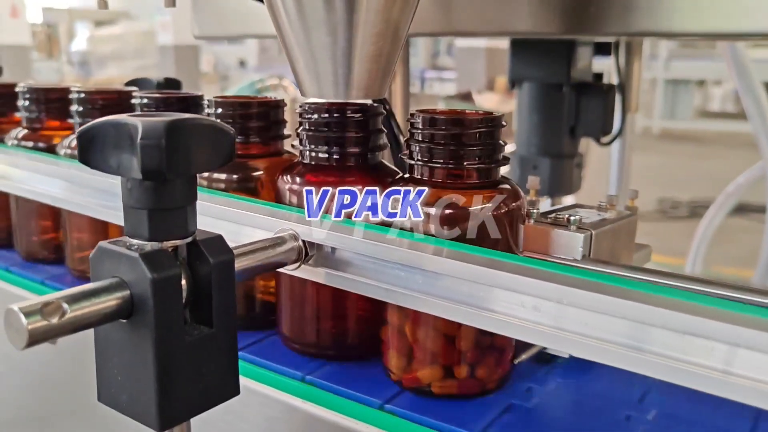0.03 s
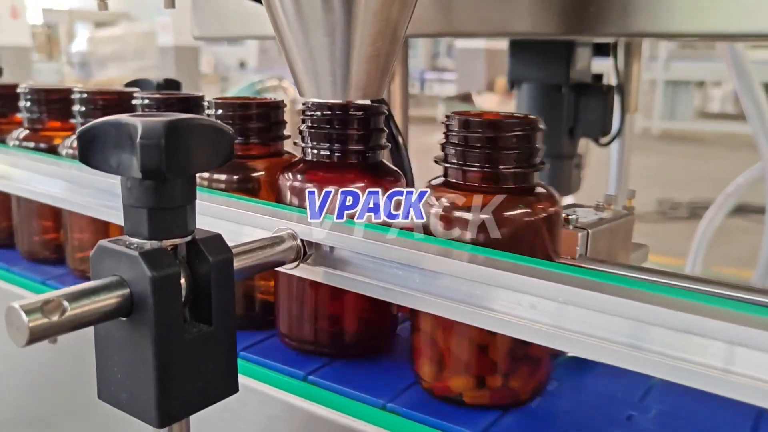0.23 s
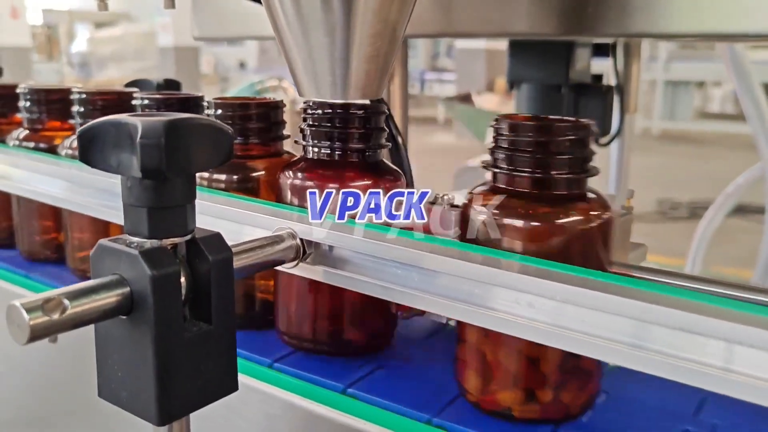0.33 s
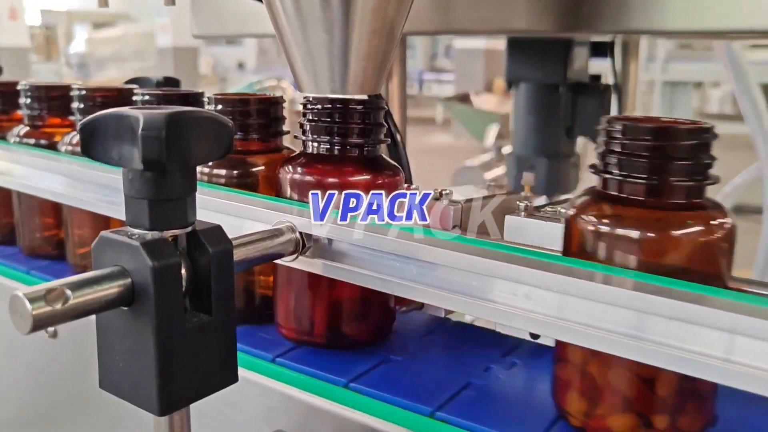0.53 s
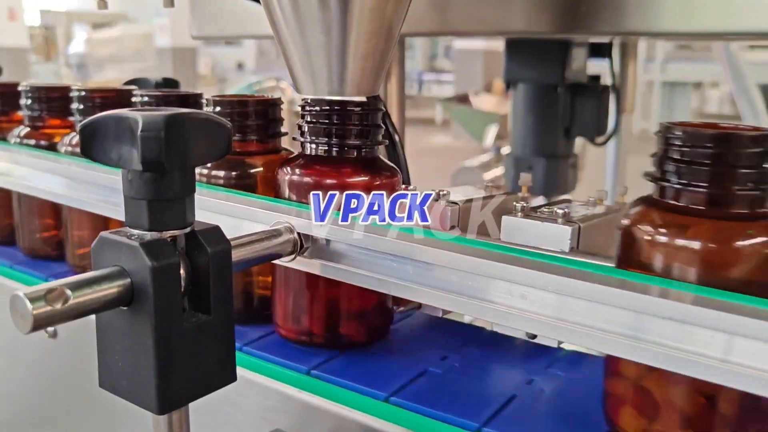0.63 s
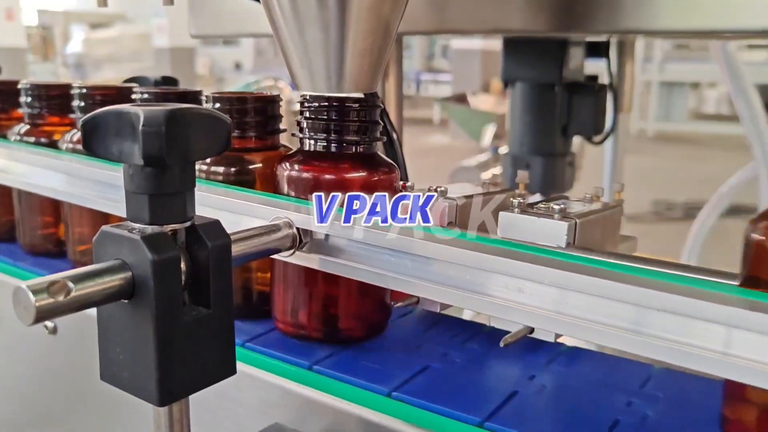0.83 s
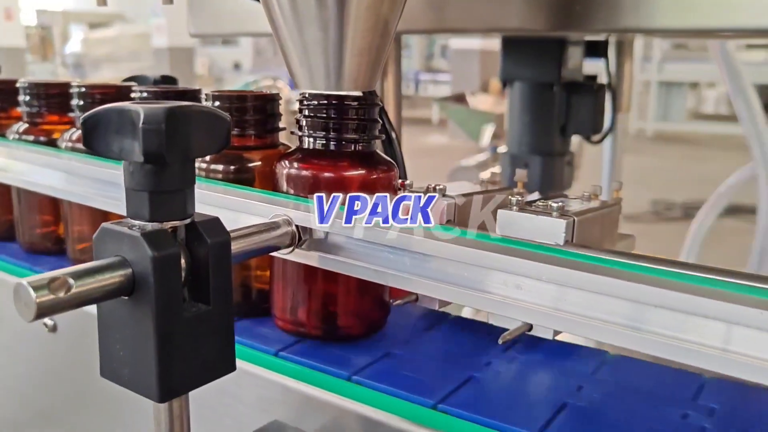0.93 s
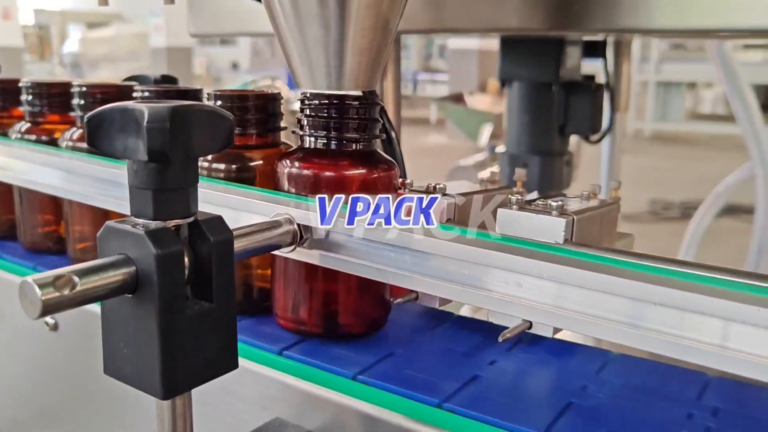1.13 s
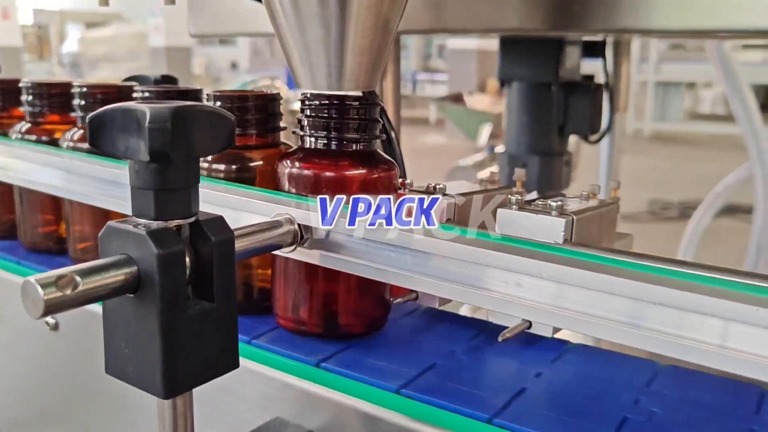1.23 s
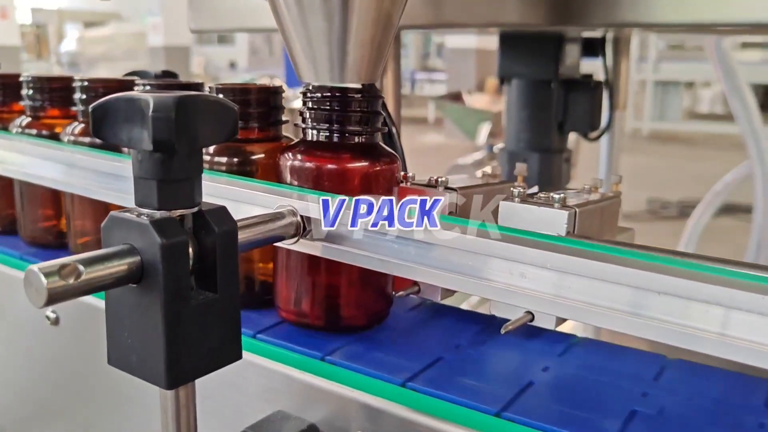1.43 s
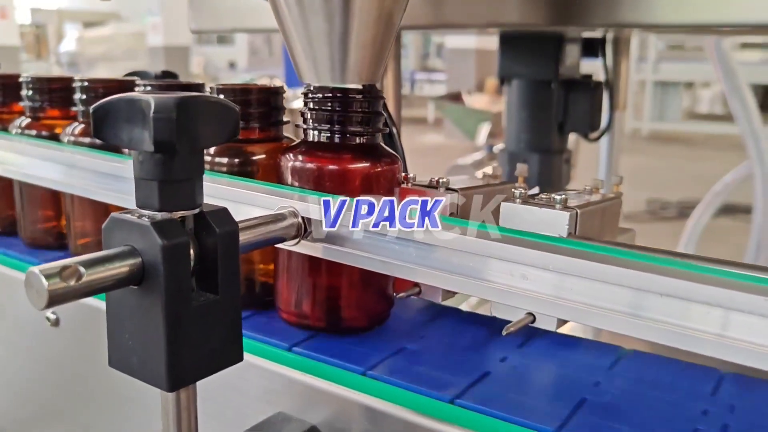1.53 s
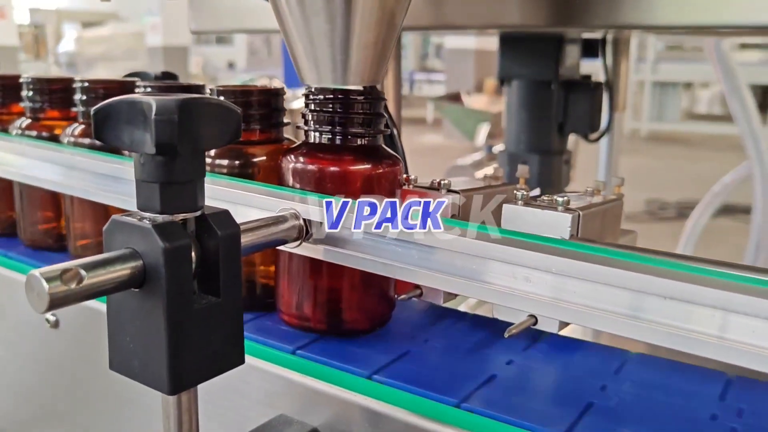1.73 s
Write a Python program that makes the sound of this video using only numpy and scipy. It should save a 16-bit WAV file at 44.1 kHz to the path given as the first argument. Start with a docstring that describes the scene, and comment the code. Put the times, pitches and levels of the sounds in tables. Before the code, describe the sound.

Capsules rattle into a plastic bottle, close up, over a steady factory hum. Air puffs at about 0.2 seconds and a steel gate clanks open at 0.3. Capsules clatter down a funnel, knocking into the bottle from 0.45 to 0.75 seconds. With another puff, the gate clacks shut near 0.9. Soft, scattered ticks and a faint whirr follow, and a low motor hum fades in from 1.6 seconds.

```python
"""A humming factory hall, close to the capsule filler of a packaging line.
An air cylinder puffs turbulent exhaust and throws a steel gate open, exciting its normal modes.
Capsules rattle down the funnel in a train of small impacts and knock a plastic bottle into resonance.
The gate clacks shut, the feeder ticks on and a motor starts to hum."""
import sys
import numpy as np
from scipy import signal
from scipy.fft import rfft, irfft
from scipy.io import wavfile
from scipy.ndimage import uniform_filter1d

SR = 44100
rng = np.random.default_rng(int(sys.argv[2]) if len(sys.argv) > 2 else 0)


def put_to_file(sound):
    """Save the sound as 16-bit audio at rate SR, in the file named by the first command-line argument."""
    columns = np.atleast_2d(sound).T  # one column per channel
    safe = np.clip(columns, -1, 1)
    whole_steps = np.round(safe * 32767)
    wavfile.write(sys.argv[1], SR, whole_steps.astype(np.int16))


N = 79380
TIME = np.arange(N) / SR
RING_TIME = TIME[:SR // 2]

# Capsule stream and single scrapes in the funnel: t/s, level/dB
FLOW = [(.31, -34.5), (.325, -28), (.365, -28.5), (.403, -36.5), (.44, -31.5), (.47, -29), (.5, -35),
        (.552, -38.5), (.585, -33.5), (.62, -35.5), (.652, -53), (.675, -36), (.72, -53.5), (.75, -51),
        (.79, -68)]
SCRAPES = [(.381, -27), (.411, -25), (.427, -29)]
# Landings in the bottle: t/s, ring level/dB, click level/dB, bottle f/Hz, shell f/Hz
KNOCKS = [(0.449, -22, -18, 1463, 3740), (0.4547, -21.5, -17, 1473, 4950), (0.4658, -20, -18, 1467, 5920),
          (0.5108, -15.5, -27.5, 1498, 2950), (0.5625, -22, -22.5, 1480, 4820),
          (0.5705, -24, -19.5, 1465, 4200), (0.5802, -21.5, -29, 1464, 2395), (.586, -21, -26, 1471, 4060),
          (0.6051, -21.5, -27, 1492, 4270), (0.6777, -22, -29.5, 1493, 2875), (0.703, -36, -37, 1510, 4730),
          (0.7285, -29, -33, 1495, 2550), (0.7325, -17, -21.5, 1501, 4050), (1.478, -47, -49, 2720, 6350)]
# Modes of the bottle: frequency ratio, level/dB
BOTTLE_MODES = [(1, 1), (1.68, -13), (1.84, -17.5), (1.95, -15), (2.75, -15.5)]
# Blows on gate and funnel: t/s, ring level/dB, click level/dB, favoured f/Hz
CLANKS = [(.3145, -16.5, -26, 617), (.3374, -22.5, -33, 1780), (.3551, -14, -23.5, 1700),
          (.403, -28.5, -53, 1820), (.412, -24.5, -44, 4940)]
# Modes of that steel and of the gate's stop: f/Hz, level/dB, T60/s
STEEL_MODES = [(554.6, 1, 0.06), (660.8, -1, 0.29), (1700, 2, 0.039), (1779, -6.5, 0.12),
               (2555, -2.5, 0.073), (3170, -4, 0.24), (3420, 0, 0.13), (4080, -3, 0.09),
               (4875, 10.5, 0.092), (5460, -6, 0.12), (6200, -7, .14)]
STOP_MODES = [(333, -20.5, 0.078), (460, -19, 0.16), (1213, -3.5, 0.044), (1425, -8, 0.026),
              (1522, -2, 0.09), (1700, -0.5, 0.043), (1958, -6, 0.029), (2240, -9, 0.027),
              (3902, 0.5, 0.025), (4100, -3.5, 0.022), (4630, 3.5, 0.026), (4850, -5, .03),
              (5150, 3.5, 0.023), (5456, 5, 0.028), (7060, 1, 0.04)]
# Exhaust puffs: peak t/s, level/dB, rise/s, T60/s
PUFFS = [(0.207, -33, 0.005, 0.11), (.234, -33.5, 0.02, 0.13), (0.264, -17, .013, 0.087),
         (0.85, -36.5, 0.0072, 0.16), (0.868, -28.5, 0.014, 0.076)]
# Jolts of the piston: t/s, level/dB, T60/s
THUMPS = [(0.203, -41, 0.091), (0.215, -29.5, 0.13), (0.263, -38, 0.14), (.313, -27.5, 0.11),
          (.845, -37, 0.17), (.932, -47, 0.089)]
# Feeder ticks: t/s, level/dB, rise/s, T60/s, tilt/(dB per octave)
TICKS = [(0.038, -40.5, 0.0014, 0.14, -2.5), (0.091, -35, 0.003, 0.087, 0.5), (1.056, -33, 0.002, 0.089, 1),
         (1.164, -45, 0.0012, 0.067, 0.5), (1.233, -36, 0.0063, 0.11, -1.5), (1.427, -43, 0.0018, 0.063, 7),
         (1.4365, -36, 0.0028, 0.089, 2), (1.618, -38, 0.006, 0.11, -0.5)]
# Partials of the motor: f/Hz, level/dB
HUM_PARTIALS = [(156.3, -45.5), (262, -56)]
# Envelopes of the hall's noise, its relative treble and the drive's whirr: t/s, level/dB
HALL_LEVEL = [(0, -47), (.17, -49), (.8, -51), (1.0, -51), (1.35, -52), (1.55, -51), (1.8, -49)]
TREBLE_LEVEL = [(.09, 4), (.15, 0), (1.0, 2), (1.31, -5.5), (1.41, -6.5), (1.47, -5), (1.75, 1)]
WHIRR_LEVEL = [(.7, -57), (1.12, -61.5), (1.22, -53), (1.8, -54)]
# Spectral densities of the noises: f/Hz, relative level/dB
RATTLE_SPECTRUM = [(200, -3.5), (500, -1.5), (1000, -12), (1700, 0.5), (2100, -3.5), (2650, 2),
                   (3200, -6.5), (5200, -3), (7000, -4.5), (9500, -19.5), (11500, -13.5), (15600, -21)]
SCRAPE_SPECTRUM = [(3800, -19.5), (4850, -2), (5550, 3), (6300, -16), (9000, -32)]
SHELL_SPECTRUM = [(500, -16), (900, -17), (1400, 2), (2000, -7.5), (2700, 7.5), (3400, 0.5), (4600, 8),
                  (6000, -2.5), (8400, -2), (9800, -13.5), (15600, -23)]
STOP_SPECTRUM = [(200, -9), (900, -4.5), (1450, 6), (3200, -7.5), (3900, -3), (5100, 1), (7400, 1),
                 (8600, -9), (15600, -8)]
AIR_SPECTRUM = [(100, -26), (500, -7.5), (1200, -1), (2700, 1), (3900, -2.5), (4800, 5.5), (5400, 1),
                (7500, -3), (9500, -13.5), (11500, -7), (15500, -11.5)]
FRAME_SPECTRUM = [(30, -38), (47, -42), (66, -4.5), (130, -5.5), (260, -6), (450, -12.5), (3000, -47)]
TICK_SPECTRUM = [(150, -21), (500, 0), (1200, -9), (1700, 6), (2200, -6.5), (2900, 2.5), (3450, 5.5),
                 (4300, -1.5), (5600, -6.5), (7400, -0.5), (9200, -24), (11500, -17.5), (15500, -34)]
HALL_SPECTRUM = [(25, -50), (70, -8.5), (115, -10.5), (180, -3), (300, -4), (430, -0.5), (800, -2.5),
                 (1230, -11), (1560, 0), (2300, -10), (2700, -1), (3100, -11), (4550, -3.5), (5600, -11),
                 (6400, -10), (8600, -18.5), (9200, -49), (11700, -29), (13500, -43), (15500, -33)]
WHIRR_SPECTRUM = [(200, -45), (390, -8.5), (470, 1), (560, -14), (720, -17.5), (1500, -48.5)]
WHITE = [(20, 0), (20000, 0)]
# Reverberation time of the hall: f/Hz, T60/s
HALL_T60 = [(100, 0.24), (600, 0.66), (5000, 0.42), (12000, 0.16)]
# Likeness of left and right: f/Hz, correlation
CORRELATION = [(150, .992), (600, .9), (1400, .5), (2300, -.15), (5000, .05)]
# Boost on the right, and equal cut on the left, for distant sources: f/Hz, level/dB
FAR_RIGHT = [(3500, 0.3), (6000, 3.5), (9000, 1), (15500, 4)]
# Microphone responses: f/Hz, level/dB
LEFT_MIC = [(1200, 0), (3500, -0.5), (5700, -4), (7200, 0), (8400, 4), (13000, 0), (15500, 3)]
RIGHT_MIC = [(1200, -0.5), (2700, 5), (6300, 5), (7400, 0), (8100, -3), (8700, -35), (9600, -7.5),
             (13500, 0), (15500, 8)]


def funnel(contacts_per_s=1500, spread_db=2.4, contact_t60=.016, spots=10, detune=.06):
    """Random impacts of sliding capsules each ring one spot of the wall; friction adds scrapes."""
    hits = rng.random(N) < contacts_per_s / SR
    contacts = hits * amp(spread_db * np.minimum(rng.exponential(1, N), 3))
    power = signal.fftconvolve(contacts ** 2, amp(-60 * RING_TIME / contact_t60) ** 2)[:N]
    clicks = unit_rms(low_cut(np.sqrt(abs(power)) * noise(RATTLE_SPECTRUM)))
    spot = rng.integers(0, spots, N)
    ringing = np.zeros((2, N))
    for k in range(spots):
        modes = [(hz * (1 + detune * rng.uniform(-1.02, 1)), db, .05)
                 for hz, db, _ in STEEL_MODES if hz > 2000]
        ringing += signal.fftconvolve((contacts * (spot == k))[None], ring(modes, .0016), axes=1)[:, :N]
    pouring = (TIME > FLOW[0][0]) & (TIME < FLOW[-1][0])
    out = pouring * envelope(FLOW) * (clicks + amp(-4) * unit_rms(ringing))
    for s, db in SCRAPES:
        add(out, s, burst(SCRAPE_SPECTRUM, db, rise=.0022, t60=.099))
    return out


def bottle(rise=.0013, bottle_t60=.035, shell_t60=.03):
    """A collision excites both bodies: the bottle and the capsule's shell ring at their own pitches."""
    out = np.zeros((2, N))
    for s, ring_db, click_db, bottle_hz, shell_hz in KNOCKS:
        body = ring([(bottle_hz * ratio, db, bottle_t60) for ratio, db in BOTTLE_MODES], rise, hold=.004)
        shell = ring([(shell_hz, click_db - 1, shell_t60)], rise)
        click = burst(SHELL_SPECTRUM, click_db, rise=.00048, t60=.039)
        add(out, s, amp(ring_db) * body + shell + click)
    return out


def gate(favour_octaves=.4, others_db=-18, shut_s=.8708):
    """Free vibration of struck steel: each blow favours nearby modes; closing rings the stop."""
    out = np.zeros((2, N))
    for s, ring_db, click_db, favoured_hz in CLANKS:
        modes = []
        for hz, db, t60 in STEEL_MODES:
            mismatch = 1 - np.exp(-(np.log2(hz / favoured_hz) / favour_octaves) ** 2)
            modes.append((hz, db + others_db * mismatch, t60))
        clank = amp(ring_db) * ring(modes, rise=.002)
        click = low_cut(burst(RATTLE_SPECTRUM, click_db, rise=.00038, t60=.064))
        add(out, s, clank + click)
    stop = amp(-16) * ring(STOP_MODES, rise=.0016, hold=.003)
    clack = burst(STOP_SPECTRUM, db=-18.5, rise=.0016, t60=.055)
    shudder = burst(STOP_SPECTRUM, db=-38, rise=.0016, t60=.22)  # the machine rings on
    add(out, shut_s, stop + clack + shudder)
    return out


def cylinder(frame_hz=104):
    """Turbulent puffs of exhaust are incoherent, so their powers add; the piston thumps the frame."""
    power = np.zeros(N)
    for s, db, rise, t60 in PUFFS:
        below_peak_db = np.where(TIME < s, 9 * abs((s - TIME) / rise) ** 1.48, 60 * (TIME - s) / t60)
        power += amp(db - below_peak_db) ** 2
    out = np.sqrt(power) * noise(AIR_SPECTRUM)
    for s, db, t60 in THUMPS:
        thump = ring([(frame_hz, db, t60)], rise=.0048)
        add(out, s, thump + burst(FRAME_SPECTRUM, db - 2, rise=.0036, t60=t60))
    return out


def feeder():
    """Soft ticks further up the machine are damped noise; spectral tilt sets their brightness."""
    out = np.zeros((2, N))
    for s, db, rise, t60, tilt_db in TICKS:
        spectrum = [(hz, band_db + tilt_db * np.log2(hz)) for hz, band_db in TICK_SPECTRUM]
        add(out, s, burst(spectrum, db, rise, t60))
    return out


def motor(start_s=1.575, rise_s=.24, waver=.013):
    """A starting motor's hum fades in; its wavering speed modulates the frequency of both partials."""
    speed = 1 + waver * unit_rms(uniform_filter1d(rng.standard_normal(N), size=2000))
    running_time = np.cumsum(speed) / SR
    hum = sum(amp(db) * np.sin(2 * np.pi * (hz * running_time + rng.random())) for hz, db in HUM_PARTIALS)
    return hum * np.clip((TIME - start_s) / rise_s, 0, 1)


def hall(treble_hz=4000):
    """Machines superpose into broadband noise, its treble drifting; a drive whirrs in a narrow band."""
    din = noise(HALL_SPECTRUM)
    body = signal.sosfiltfilt(signal.butter(2, treble_hz, fs=SR, output="sos"), din)
    treble = envelope(TREBLE_LEVEL) * (din - body)
    whirr = envelope(WHIRR_LEVEL) * noise(WHIRR_SPECTRUM)
    return envelope(HALL_LEVEL) * (body + treble) + whirr


def reverberation(x, early_db=-10, tail_db=-15.5):
    """Early reflections off the machine precede a diffuse tail whose decay depends on frequency."""
    size = len(RING_TIME)
    early = noise(WHITE, size) * strike(rise=.0028, t60=.041)
    diffuse = noise(WHITE, size) * (1 - np.exp(-RING_TIME / .0079))
    hz, t, bands = signal.stft(diffuse, SR, nperseg=256)
    decay = amp(-60 * t / at_frequency(HALL_T60, hz)[:, None])
    tail = signal.istft(bands * decay, SR, nperseg=256)[1][:, :size]
    response = amp(early_db) * early / np.linalg.norm(early[0])
    response += amp(tail_db) * tail / np.linalg.norm(tail[0])
    return signal.fftconvolve(x, response, axes=1)[:, :N]


def ring(modes, rise, hold=0, right_lag_s=.00009):
    """Normal modes are damped sinusoids; they reach the right microphone slightly later."""
    t = RING_TIME - np.array([[0], [right_lag_s]])
    return sum(amp(db) * strike(rise, t60, hold) * np.sin(2 * np.pi * (hz * t + rng.random()))
               for hz, db, t60 in modes)


def burst(spectrum, db, rise, t60):
    """The dense, short-lived modes of a blow merge into decaying noise."""
    return amp(db) * strike(rise, t60) * noise(spectrum, len(RING_TIME))


def strike(rise, t60, hold=0):
    """Exponential damping after a quick rise and an optional hold."""
    return (1 - np.exp(-(RING_TIME / rise) ** 2)) * amp(-60 * np.maximum(RING_TIME - hold, 0) / t60)


def noise(spectrum, size=N):
    """Random phases give stereo noise of rms 1, nearly coherent in the bass."""
    hz = np.fft.rfftfreq(size, 1 / SR)
    left, independent = np.exp(2j * np.pi * rng.random((2, len(hz))))
    correlation = np.clip(at_frequency(CORRELATION, hz), -1, 1)
    right = correlation * left + np.sqrt(1 - correlation ** 2) * independent
    return unit_rms(irfft(np.array([left, right]) * amp(at_frequency(spectrum, hz)), size))


def low_cut(x, hz=450):
    """High-pass filtering: light contacts carry little bass."""
    return signal.sosfilt(signal.butter(2, hz, "high", fs=SR, output="sos"), x)


def colour(x, left, right):
    """Filtering multiplies each channel's spectrum by its own response."""
    hz = np.fft.rfftfreq(2 * N, 1 / SR)
    return irfft(rfft(x, 2 * N) * amp([at_frequency(left, hz), at_frequency(right, hz)]))[:, :N]


def amp(db):
    """Amplitude ratio of a level in decibels."""
    return 10 ** (np.asarray(db) / 20)


def unit_rms(x):
    """Normalisation to rms 1."""
    return x / np.sqrt(np.mean(x ** 2) + 1e-20)


def at_frequency(points, hz):
    """Interpolation on a log-frequency axis."""
    f, value = np.transpose(points)
    return np.interp(np.log(hz + 1), np.log(f), value)


def envelope(points):
    """Amplitude over time, interpolated in decibels."""
    return amp(np.interp(TIME, *np.transpose(points)))


def add(mix, s, sound):
    """Superposition of a stereo sound from time s."""
    part = mix[:, max(round(s * SR), 0):][:, :sound.shape[1]]
    part += sound[:, :part.shape[1]]


def scene():
    """Direct and reflected sound add in front; a level difference puts the rest of the line right."""
    far_left = [(hz, -db) for hz, db in FAR_RIGHT]
    far = colour(motor() + hall() + feeder(), far_left, FAR_RIGHT)
    rush, steel, knocks = cylinder() + funnel(), gate(), bottle()
    reflected = reverberation(rush + amp(-9) * steel + amp(-8) * knocks)
    return rush + steel + knocks + reflected + far


def record(dry, ceiling=.8, edge_hz=15800):
    """Two microphone ports colour the sound; soft saturation and a band limit follow."""
    heard = colour(dry, LEFT_MIC, RIGHT_MIC)
    heard = heard / (1 + (heard / ceiling) ** 4) ** .25
    low_pass = signal.firwin(511, edge_hz, window=("kaiser", 9), fs=SR)
    return signal.oaconvolve(heard, low_pass[None], "same")


dry = scene()
out = record(dry)
put_to_file(out)
```